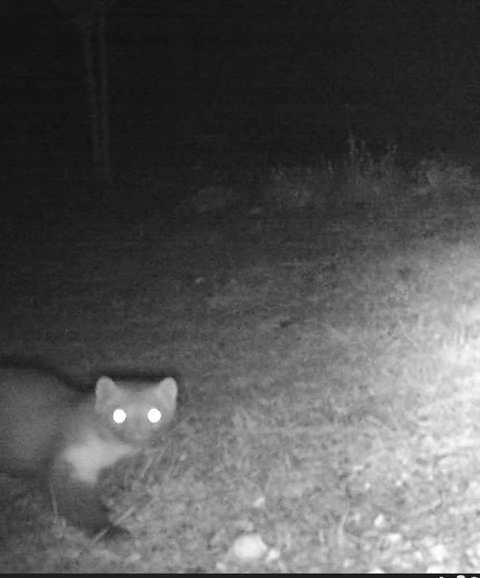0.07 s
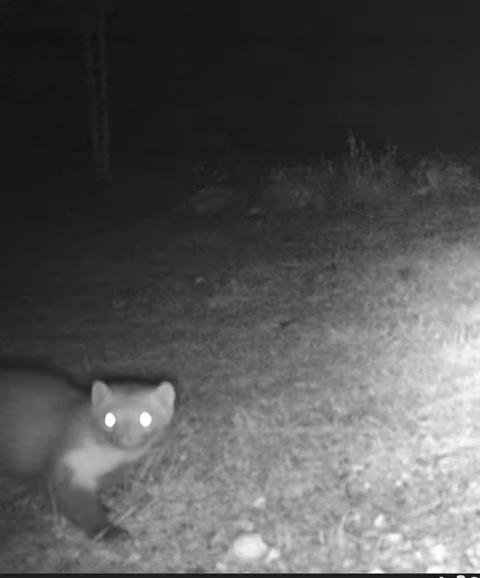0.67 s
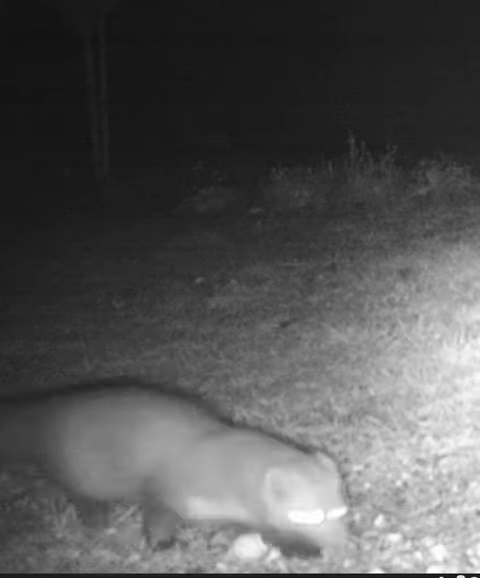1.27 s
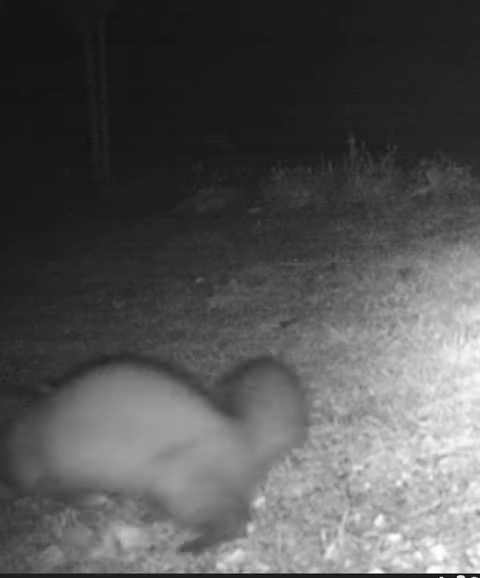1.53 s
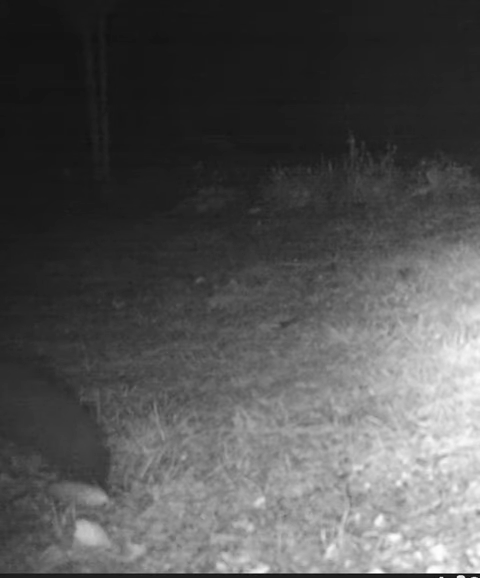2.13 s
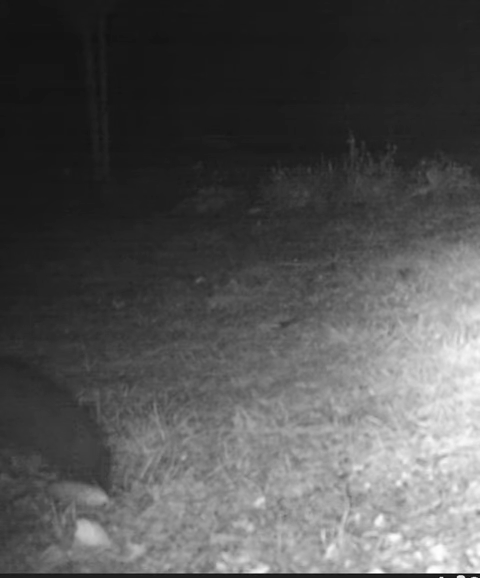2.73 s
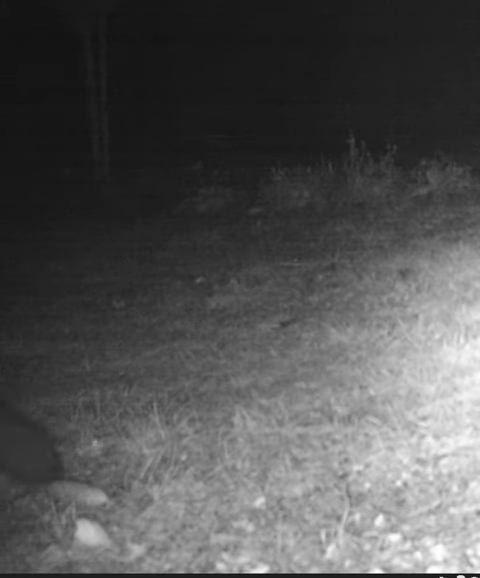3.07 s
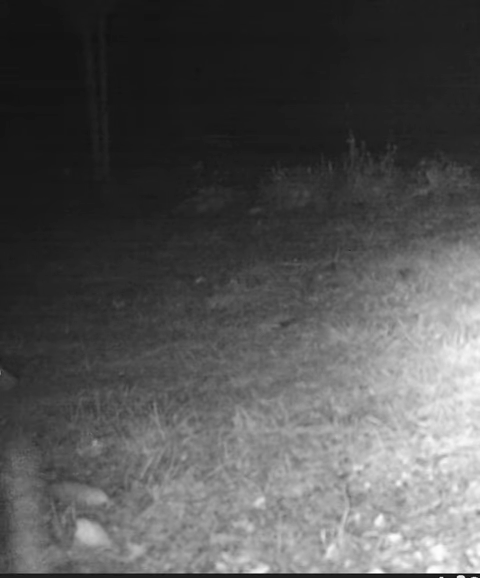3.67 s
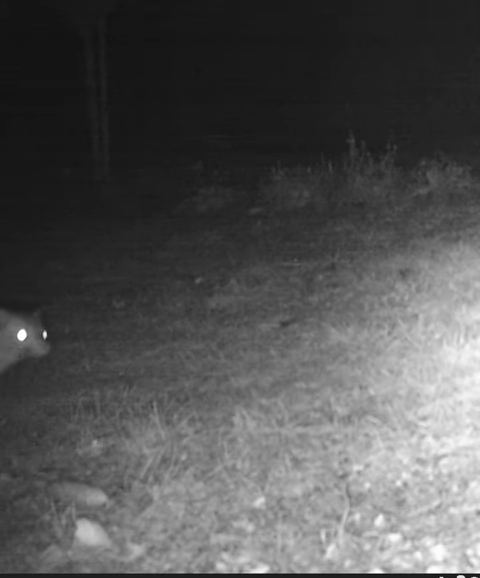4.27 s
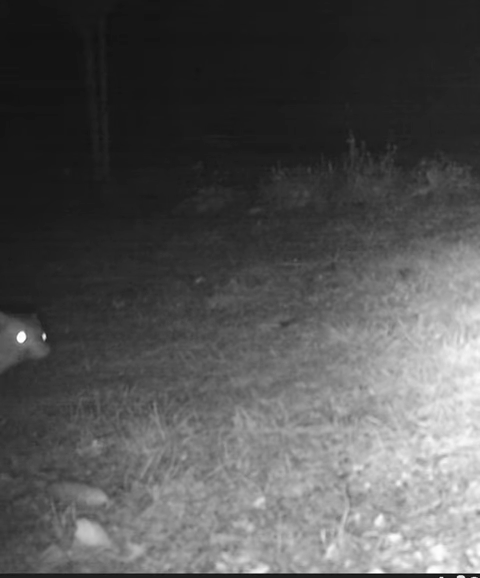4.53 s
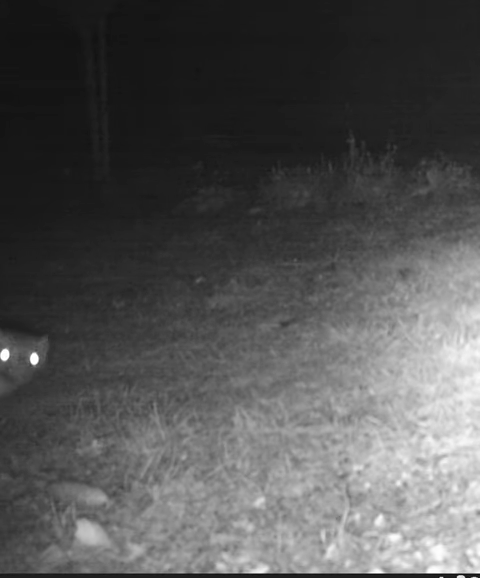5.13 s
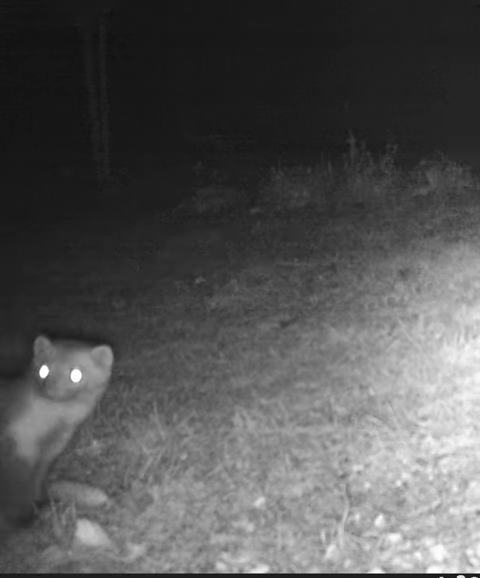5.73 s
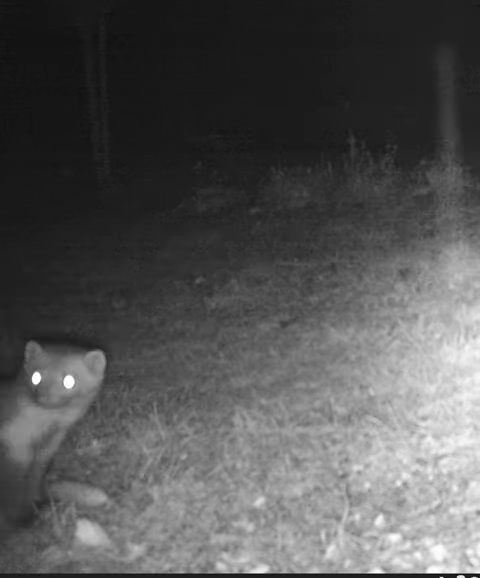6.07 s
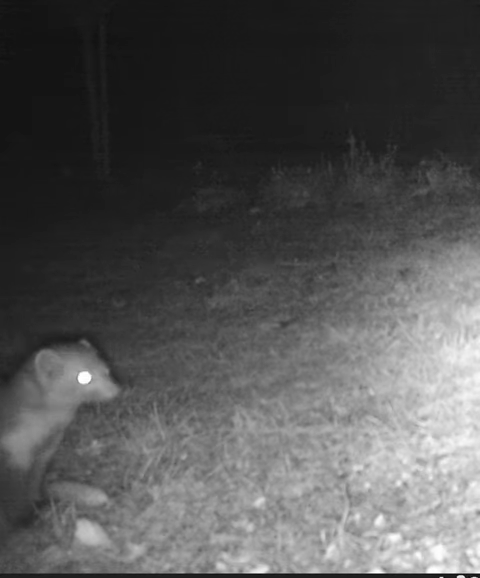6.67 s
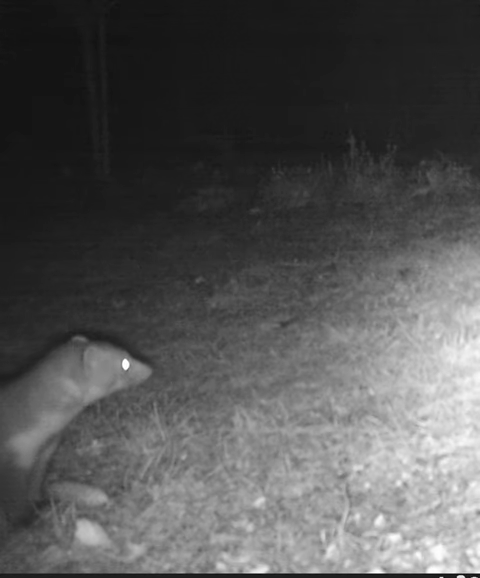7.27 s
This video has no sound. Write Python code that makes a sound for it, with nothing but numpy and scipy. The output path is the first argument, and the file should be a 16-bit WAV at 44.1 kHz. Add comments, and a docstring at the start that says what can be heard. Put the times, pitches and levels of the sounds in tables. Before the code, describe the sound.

A microphone in a quiet garden at night switches on with a short, low pop, by far the loudest sound. A faint, steady hiss follows and runs to the end, lying over a deep rumble and a soft electronic throb that pulses about five times a second. Near the end, something small and hard gives one tiny tick.

```python
"""A night camera listens to a quiet garden while a marten moves about unheard.
First its microphone switches on with a pop, as the power jumps up. Then it hisses steadily
over a faint rumble and a low throb, five a second, probably from the camera's own electronics.
Late on, something small and hard gives one tiny tick."""
import sys
import numpy as np
from scipy import signal
from scipy.fft import rfft, irfft
from scipy.io import wavfile

SR = 44100
rng = np.random.default_rng(int(sys.argv[2]) if len(sys.argv) > 2 else 0)


def master(y):
    """Save y as 16-bit WAV."""
    cut = np.clip(np.atleast_2d(y).T, -1, 1)
    pcm = np.round(cut * 32767)  # scale
    wavfile.write(sys.argv[1], SR, pcm.astype(np.int16))


N = 330309
T = np.arange(N) / SR
SWITCH_ON_S = 0.0363


def gain_of(db):
    """Turns decibels into a number to multiply a sound by."""
    return 10 ** (np.asarray(db) / 20)


def noise(spectrum):
    """Random noise of average (rms) size 1; the table says which frequencies are strong."""
    hz, db = np.transpose(spectrum)
    log_hz = np.log(np.fft.rfftfreq(N, 1 / SR) + 1)
    colour = gain_of(np.interp(log_hz, np.log(hz + 1), db))
    x = irfft(rfft(rng.standard_normal(N)) * colour, N)
    return x / np.std(x)


def add(mix, start_s, sound):
    """Adds a sound to the mix, starting at the given time."""
    part = mix[max(round(start_s * SR), 0):][:len(sound)]
    part += sound[:len(part)]


def microphone_hiss(gain_db=-57):
    """The microphone makes a steady noise of its own."""
    # shape of the hiss before the tone filters: f/Hz, relative level/dB
    spectrum = [(20, 9), (100, 4), (200, 4.5), (320, 0), (630, -4.5), (1000, -5.5), (2000, -7.5),
                (3200, -11), (4500, -13), (7000, -15), (7900, -21), (8800, -42)]
    return gain_of(gain_db) * noise(spectrum)


def rumble(gain_db=-56.5):
    """A deep, even noise lies under the hiss."""
    # shape of the rumble: f/Hz, relative level/dB
    spectrum = [(3, 2), (12, 5.5), (25, -2), (50, -4), (72, -9), (100, -12), (140, -18), (300, -56)]
    return gain_of(gain_db) * noise(spectrum)


def throbs(swing_s=0.031, sag_db=-3, sag_s=0.024, lag_s=0.012,
           flutter_s=0.03, flutter_hz=78, spread_octaves=0.74):
    """Each throb is a soft, deep swing with a short flutter; the wave sags just after its middle."""
    # one row per throb: t/s, swing f/Hz, swing level/dB, flutter level/dB
    beats = [(0.278, 32, -49.5, -62.5), (0.472, 35, -47, -57), (0.69, 39.3, -47.5, -64),
             (0.867, 28.8, -48.5, -69), (1.085, 29, -49, -63), (1.279, 35, -48, -61),
             (1.488, 32, -48.5, -60), (1.675, 31, -46.5, -67), (1.896, 35, -47, -60), (2.076, 35, -57, -60),
             (2.271, 40, -50, -64), (2.489, 36.5, -45.5, -59), (2.689, 29, -47.5, -61.5),
             (2.903, 33.6, -48, -61), (3.081, 39, -47, -54.5), (3.29, 29, -51, -60), (3.455, 39, -48, -62),
             (3.7, 32, -48, -63), (3.861, 40, -46, -56), (4.109, 30, -44.5, -63), (4.286, 34.8, -46.5, -71),
             (4.513, 35, -47, -69), (4.674, 38, -47, -55), (4.888, 37.7, -43.5, -57.5),
             (5.089, 23, -44, -64), (5.274, 43, -50, -57), (5.474, 32, -50, -61), (5.673, 39, -47, -56.5),
             (5.885, 43, -49, -60), (6.073, 40.6, -44.5, -57), (6.283, 31, -52.5, -60),
             (6.489, 39, -58, -59.5), (6.683, 26, -49, -60), (6.876, 37.8, -49, -64), (7.082, 36, -46, -53),
             (7.288, 35.6, -44, -54)]
    out = np.zeros(N)
    t = np.arange(-SR // 8, SR // 8) / SR  # zero is the middle of a throb
    for middle_s, hz, swing_db, flutter_db in beats:
        swing = -np.cos(2 * np.pi * hz * t) * np.exp(-(t / swing_s) ** 2)
        distance_squared = ((t - lag_s) / sag_s) ** 2
        sag = -gain_of(sag_db) * (1 - distance_squared) * np.exp(-distance_squared)
        detune, phase = rng.random(2)  # each flutter gets its own pitch
        cycles = flutter_hz * 2 ** (spread_octaves * (detune - 0.5)) * t + phase
        flutter = np.cos(2 * np.pi * cycles) * np.exp(-(t / flutter_s) ** 2)
        add(out, middle_s + t[0], gain_of(swing_db) * (swing + sag) + gain_of(flutter_db) * flutter)
    return out


def tick(contact_s=0.00018):
    """Something small and hard is tapped, bounces twice and rings very briefly."""
    # the tap and its bounces: t/s, level/dB
    taps = [(6.2046, -53.5), (6.2062, -60), (6.2074, -67)]
    # the tones it rings with: f/Hz, relative level/dB, time to fade by 60 dB/s
    tones = [(1024, 7, 0.02), (2020, -8, 0.017), (4480, 5, 0.0093), (5210, 13, 0.012), (5900, 6, .011),
             (7280, 9, .010), (8450, -15, .008)]
    out = np.zeros(N)
    t = np.arange(SR // 10) / SR
    ring = np.zeros(len(t))
    for k, (hz, db, fade_s) in enumerate(tones):
        direction = (-1) ** k  # neighbouring tones swing opposite ways
        ring += direction * gain_of(db - 60 * t / fade_s) * np.sin(2 * np.pi * hz * t)
    attack = 1 - np.exp(-t / contact_s)
    for start_s, db in taps:
        add(out, start_s, gain_of(db) * ring * attack)
    return out


def power_pop(step_db=-21.0, slow_share=0.17, charge_s=0.0024, drain_s=0.112):
    """The microphone's power jumps and charges up; the jump drains away through a capacitor."""
    t = np.maximum(T - SWITCH_ON_S, 0)
    rise = 1 - slow_share * np.exp(-t / charge_s)
    return gain_of(step_db) * rise * np.exp(-t / drain_s)


def scene():
    """All the sounds in one channel, silent until the microphone gets power."""
    mix = microphone_hiss() + rumble() + throbs() + tick() + power_pop()
    switched_on = T >= SWITCH_ON_S
    return (mix * switched_on)[None]


def record(dry, cutoff_hz=8850):
    """The camera's tone filters lift the bass, turn down three bands and cut the highest sounds."""
    # one bass lift and three dips: middle f/Hz, width/Hz, level change/dB
    tone_filters = [(98, 60, 2.5), (166.2, 192, -10.5), (634.7, 531, -24.5), (4964, 5900, -10.5)]
    x = dry
    for hz, width_hz, db in tone_filters:
        without_band = signal.lfilter(*signal.iirnotch(hz, hz / width_hz, SR), x)
        band = x - without_band
        x = without_band + gain_of(db) * band
    low_pass = signal.firwin(401, cutoff_hz, window=("kaiser", 8), fs=SR)
    return signal.oaconvolve(x, low_pass[None], "same")


dry = scene()
out = record(dry)
master(out)
```